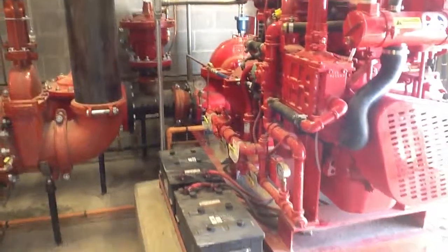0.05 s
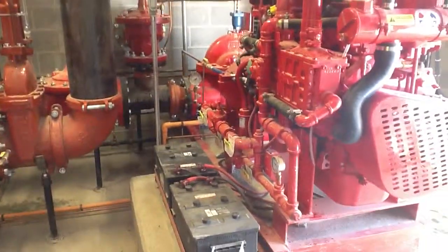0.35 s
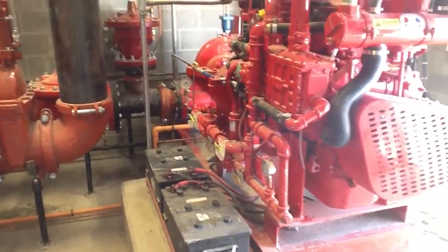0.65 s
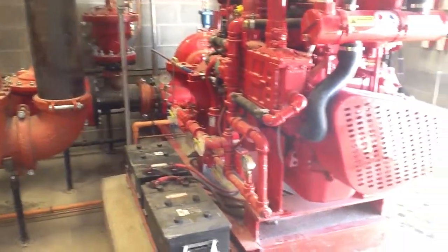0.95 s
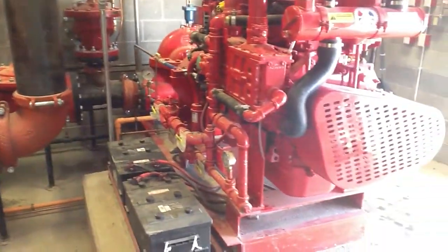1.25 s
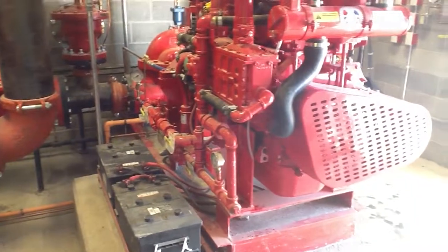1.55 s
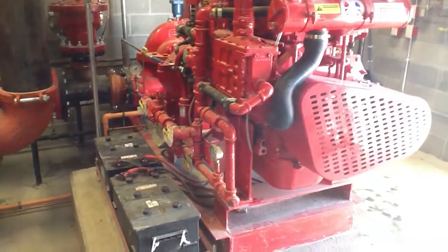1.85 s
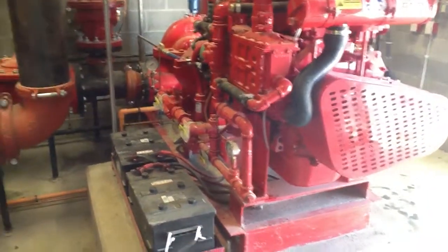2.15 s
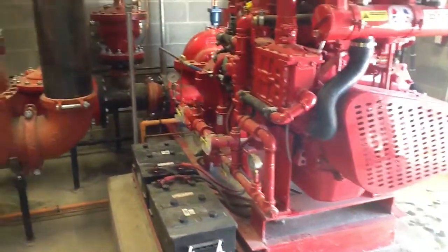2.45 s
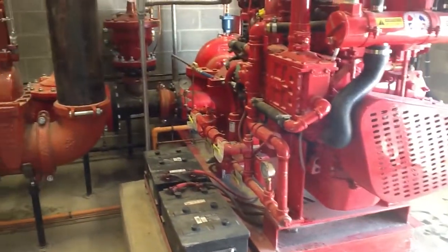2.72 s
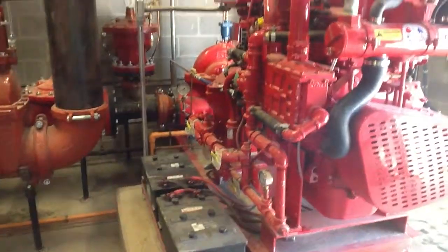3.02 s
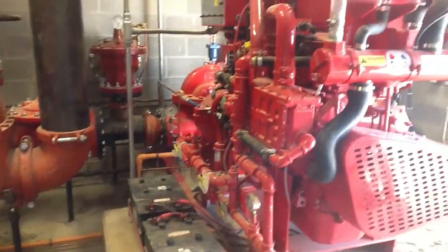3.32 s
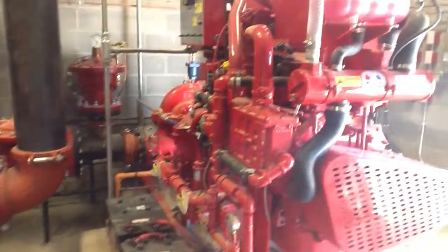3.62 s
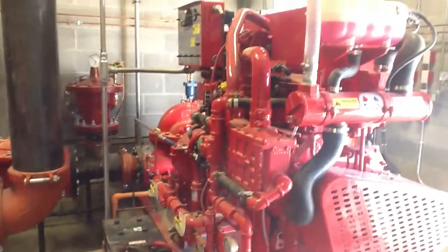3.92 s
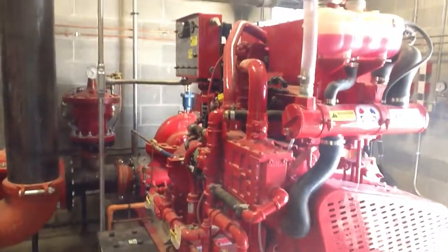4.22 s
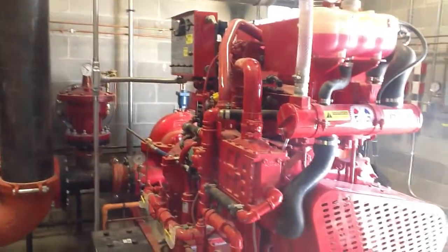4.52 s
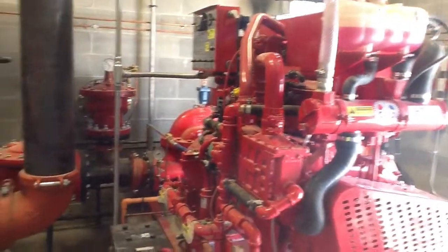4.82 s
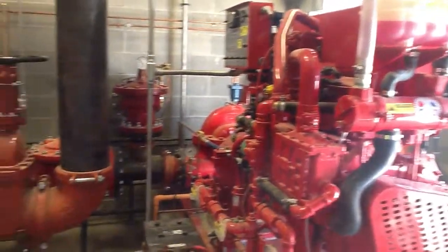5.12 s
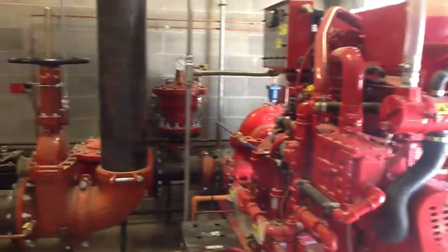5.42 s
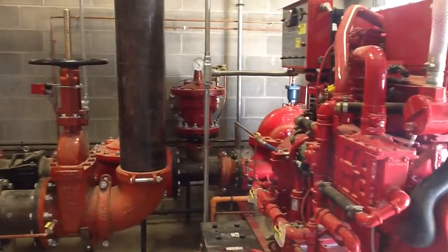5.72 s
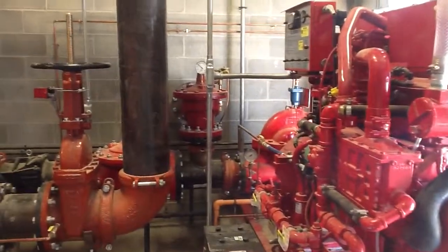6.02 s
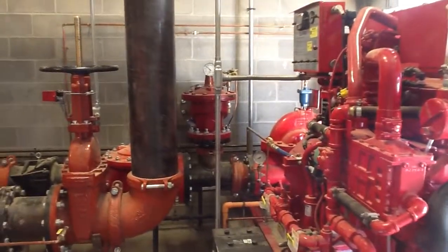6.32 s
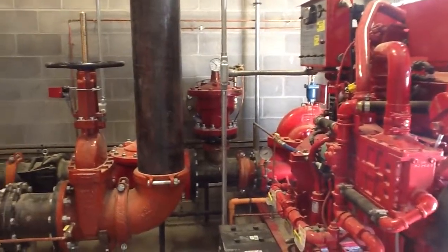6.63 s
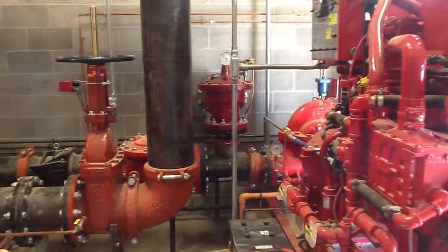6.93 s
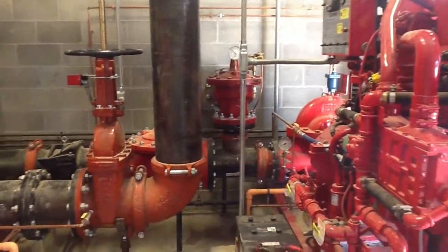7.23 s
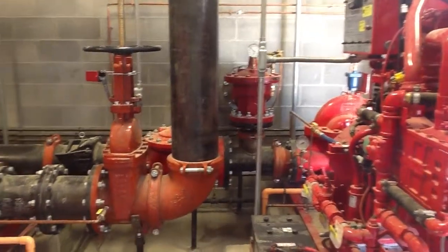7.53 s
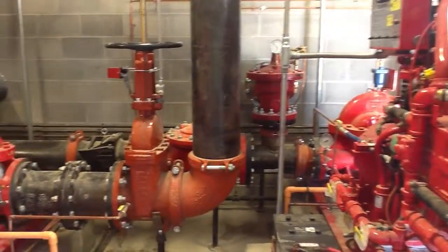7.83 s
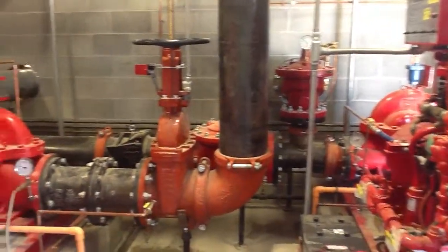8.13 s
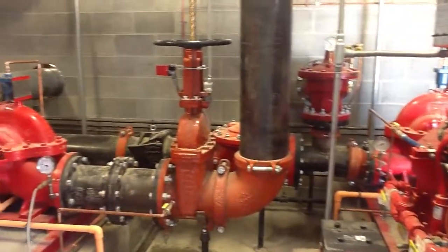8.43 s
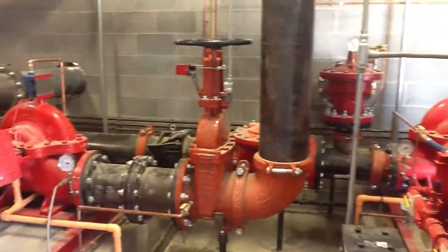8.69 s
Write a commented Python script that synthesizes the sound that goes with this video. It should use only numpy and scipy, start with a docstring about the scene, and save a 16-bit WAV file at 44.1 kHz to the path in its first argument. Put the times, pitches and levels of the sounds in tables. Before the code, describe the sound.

Close by in a pump room, a big diesel runs without a break, a loud rushing roar with a low drone and fast, even clatter. Above it a piercing turbo whistle wavers in strength. Past the middle, the hand-held microphone turns from the engine toward the pump: the whistle mostly drops away and a throbbing midrange howl comes gently forward, the engine speed never changing.

```python
"""A six-cylinder diesel drives a fire pump at governed speed in a block-walled room, a few steps away.
From the start its knock repeats each cycle as a dense harmonic series over a roar of combustion, water
and air. The turbocharger whistles, swelling as the hand-held microphone drifts through its standing
waves, and gain control ducks the roar at the loud swells. After about five seconds the microphone
leaves the intake's beam and turns to the pump: the whistle fades and the howl of the casing grows."""
import sys
import numpy as np
from scipy import signal
from scipy.fft import rfft, irfft
from scipy.io import wavfile
from scipy.ndimage import uniform_filter1d

SR = 44100
rng = np.random.default_rng(int(sys.argv[2]) if len(sys.argv) > 2 else 0)


def file_out(sig):
    """Save sig as 16-bit WAV at sys.argv[1]."""
    # one column per channel
    cols = np.atleast_2d(sig).T
    # limit, then scale
    lim = np.clip(cols, -1, 1)
    pcm = np.round(lim * 32767).astype(np.int16)
    wavfile.write(sys.argv[1], SR, pcm)


N = 386316
T = np.arange(N) / SR
BINS = np.fft.rfftfreq(N, 1 / SR)
CYCLE_HZ, CYLINDERS = 17.496, 6  # one cycle is two shaft turns
BAND_EDGE_HZ = 15400


def amp(db):
    """Amplitude ratio of a level in decibels."""
    return 10 ** (np.asarray(db) / 20)


def curve(rows):
    """Linear interpolation of (time, value) rows at every sample."""
    return np.interp(T, *np.transpose(rows))


def spectrum(points, hz):
    """Spectral envelope: amplitude from levels interpolated over log frequency."""
    f, db = np.transpose(points)
    return amp(np.interp(np.log(hz + 1), np.log(f + 1), db))


def noise(density):
    """Gaussian noise filtered to the given amplitude per root Hz."""
    return irfft(rfft(rng.standard_normal(N)) * density, N) * np.sqrt(SR / 2)


def wander(corner_hz):
    """Low-pass random fluctuation of unit variance."""
    x = noise(1 / (1 + (BINS / corner_hz) ** 2))
    return x / x.std()


def resonances(modes):
    """Incoherent modes add in power: their summed power per Hz."""
    return sum(amp(db) ** 2 / (1 + 2 * ((BINS - hz) / width) ** 2) ** 2 for hz, width, db in modes)


def standing_wave_db(crossings):
    """Standing waves: each node or antinode crossed gives a bell-shaped dip or rise in level."""
    return sum(db * np.exp(-((T - at) / half_width) ** 2) for at, half_width, db in crossings)


# Microphone heading: t/s, share of the turn (0 engine, 1 pump)
HEADING = [(0, 0), (2.7, 0.2), (4.7, 0.15), (6, 0.55), (8.76, 1)]
def turn_db(full_turn_db):
    """Directivity: a source's level changes as the microphone turns to the pump."""
    return full_turn_db * curve(HEADING)


# Turbulence spectrum: f/Hz, spectral density level/dB
ROAR_SPECTRUM = [(25, -104), (45, -96), (75, -86), (120, -72.5), (175, -60.5), (380, -64), (500, -66.5),
                 (750, -63), (1300, -61), (2600, -62), (4600, -64), (7000, -64), (9500, -59.5),
                 (15000, -60)]
# Modes of block, covers and belt guard: f/Hz, width/Hz, peak density level/dB
PANEL_MODES = [(209, 21, -57.5), (318, 69, -59.5), (1530, 45, -58.5), (1785, 89, -56.5), (3370, 640, -61)]
def turbulent_roar(cycles, firing_depth=0.04, lope_depth=0.02, flutter_db=0.92):
    """Amplitude modulation: each firing, and one louder cylinder, pulses turbulence and panel ringing."""
    power = spectrum(ROAR_SPECTRUM, BINS) ** 2 + resonances(PANEL_MODES)
    firing = firing_depth * np.cos(2 * np.pi * CYLINDERS * cycles)
    lope = lope_depth * np.cos(2 * np.pi * cycles)
    return noise(np.sqrt(power)) * (1 + firing + lope) * amp(flutter_db * wander(8))


# Modes of pump casing and pipes: f/Hz, width/Hz, relative peak level/dB
CASING_MODES = [(620, 39, -53), (685, 71, -55.5), (920, 91, -62), (1120, 42, -54)]
def pump_howl(cycles, throb_depth=0.21, level_db=-8.0):
    """Resonance: churning water excites the casing, throbbing once a shaft turn."""
    howl = noise(np.sqrt(resonances(CASING_MODES)))
    throb = 1 + throb_depth * np.cos(2 * np.pi * 2 * cycles)
    return howl * throb * amp(level_db + turn_db(6.5))


# Blade tone as the microphone leaves the intake's beam: t/s, level/dB
INTAKE_BEAM = [(0, -13), (.7, -9), (2.3, -9), (3.6, -15.5), (5.2, -14), (6.2, -31), (7.2, -28),
               (8.76, -23.5)]
# Nodes and antinodes of the blade tone: t/s, half-width/s, level change/dB
WHISTLE_CROSSINGS = [(.57, 0.22, 5.5), (1.15, 0.17, 5), (1.32, 0.044, -2.5), (2.78, 0.23, 6),
                     (2.94, 0.044, -11), (3.11, 0.072, 8), (3.65, 0.019, -8), (3.79, 0.047, 4.5),
                     (4.42, 0.034, 10), (4.64, 0.031, 10), (4.76, 0.087, -2.5), (5.26, .06, 5),
                     (5.36, 0.023, -14), (7.6, 0.16, 10.5), (7.89, 0.14, 12.5), (8.69, 0.043, 7.5)]
def turbo_whistle(start_hz=10512, rise_hz_per_s=9.5, flutter_db=1.17):
    """Interference: wall echoes reinforce or cancel the blade tone as the hand sways."""
    phase = 2 * np.pi * np.cumsum(start_hz + rise_hz_per_s * T) / SR
    level_db = curve(INTAKE_BEAM) + standing_wave_db(WHISTLE_CROSSINGS) + flutter_db * wander(40)
    direct = amp(level_db) * np.sqrt(2) * np.cos(phase)
    echoes = amp(-25) * wander(7) * np.cos(phase)
    scattered = amp(-27) * (wander(40) * np.cos(phase) + wander(40) * np.sin(phase))
    intake_air = noise(amp(-49) / (1 + ((BINS - 10530) / 240) ** 2))  # a noise skirt round the tone
    return direct + echoes + scattered + intake_air


# Strongest engine harmonics: order (f/CYCLE_HZ), level/dB
ENGINE_ORDERS = [(6, -55.5), (8, -51.5), (9, -33), (12, -33.5), (14, -41.5), (16, -45), (18, -34),
                 (20, -42), (21, -43), (23, -46.5), (27, -40.5), (28, -48.5), (32, -65), (33, -43.5),
                 (36, -42.5), (38, -53.5), (42, -44.5), (43, -44.5), (48, -39.5), (49, -42.5), (51, -45),
                 (52, -62), (58, -40), (60, -42.5), (63, -59), (64, -42), (66, -43), (69, -45.5),
                 (70, -45.5), (72, -46.5), (86, -37), (87, -47), (88, -47), (89, -48.5)]
# Nodes and antinodes of single harmonics: order, t/s, half-width/s, level change/dB
ORDER_CROSSINGS = [(27, 2, 2.5, 2), (36, 6.9, .9, 3), (48, 8.3, 0.67, -18), (51, 1.3, 0.88, 5),
                   (51, 8.2, 0.78, 7.5), (64, 7.5, 2.1, 6), (64, 8.17, 0.45, 4), (86, 3.65, 0.68, 3),
                   (86, 7.6, 1.3, -17), (88, 3.8, .5, 3), (89, 7.8, 1.1, 10)]
def engine_drone(cycles, waver=0.073, hum_below_hz=520):
    """Periodic forcing: firing and shaft rotation give harmonics that waver with the load."""
    hum_gain = amp(1 + turn_db(-2.5))
    out = np.zeros(N)
    for order, db in ENGINE_ORDERS:
        room_db = standing_wave_db([row[1:] for row in ORDER_CROSSINGS if row[0] == order])
        envelope = amp(db + room_db) * (1 + waver * wander(2.1))
        line = envelope * np.cos(2 * np.pi * (order * cycles + rng.random()))
        out += line * hum_gain if order * CYCLE_HZ < hum_below_hz else line
    return np.sqrt(2) * out


# Envelope of the knock: f/Hz, spectral density level/dB
KNOCK_SPECTRUM = [(50, -102), (120, -85), (230, -73), (450, -62), (700, -64), (800, -72), (950, -64),
                  (1150, -66.5), (1350, -65), (1750, -65.5), (2400, -64.5), (3400, -65.5), (5000, -68),
                  (9000, -66.5)]
def engine_knock(cycles, coherence_hz=1400, places=7, size=8192):
    """Spatial coherence: the room smears the periodic knock, and its treble varies most with place."""
    hz = np.arange(size // 2 + 1) * CYCLE_HZ
    local_share = hz ** 2 / (hz ** 2 + coherence_hz ** 2)
    lines = spectrum(KNOCK_SPECTRUM, hz) * np.sqrt(CYCLE_HZ / 2) * size * (hz < BAND_EDGE_HZ)
    lines *= amp(rng.uniform(-12.15, 7.56, len(hz)))  # metal modes favour some lines
    lines[[round(order) for order, _ in ENGINE_ORDERS]] = 0  # these sound in the drone
    common = np.sqrt(1 - local_share) * np.exp(2j * np.pi * rng.random(len(hz)))
    position = T / T[-1] * (places - 1)
    out = np.zeros(N)
    for place in range(places):
        local = np.sqrt(local_share) * np.exp(2j * np.pi * rng.random(len(hz)))
        one_cycle = irfft(lines * (common + local))
        crossfade = np.cos(np.pi / 2 * np.clip(position - place, -1, 1))
        out += crossfade * np.interp(cycles % 1 * size, np.arange(size), one_cycle)
    return out


# Nearness of the microphone to the machine: t/s, level change/dB
PROXIMITY = [(0, -0.5), (1.1, -1.2), (2.1, -0.5), (3.6, -0.8), (4.7, 0.25), (6, 0.1), (7.2, 0.46),
             (7.95, -1.6), (8.45, .5), (8.76, -1.9)]
def scene(hunting=0.0002):
    """Superposition at one microphone; the governor holds the engine speed almost constant."""
    cycles = np.cumsum(CYCLE_HZ * (1 + hunting * wander(3.5))) / SR
    machine = engine_drone(cycles) + engine_knock(cycles) + turbulent_roar(cycles) + pump_howl(cycles)
    return np.tile(machine * amp(curve(PROXIMITY)) + turbo_whistle(), (2, 1))


def record(dry, threshold_db=-9.5, decay_db_per_s=18, slope=0.57):
    """Compression: a peak detector with fast attack and slow decay lowers the gain; a low-pass follows."""
    mean_square = abs(uniform_filter1d(dry[0] ** 2, size=400))
    peak_db = 20 * np.log10(np.sqrt(2 * mean_square) + 1e-6)
    held_db = np.maximum.accumulate(peak_db + decay_db_per_s * T) - decay_db_per_s * T
    excess_db = uniform_filter1d(np.maximum(held_db - threshold_db, 0), size=1200)
    ducked = dry / amp(slope * excess_db)
    low_pass = signal.firwin(1023, BAND_EDGE_HZ, window=("kaiser", 9), fs=SR)
    return signal.oaconvolve(ducked, low_pass[None], "same")


dry = scene()
out = record(dry)
file_out(out)
```